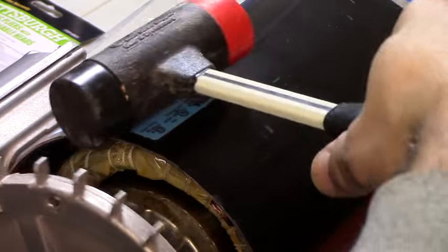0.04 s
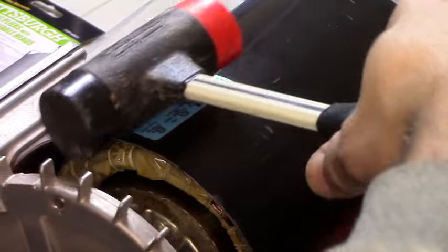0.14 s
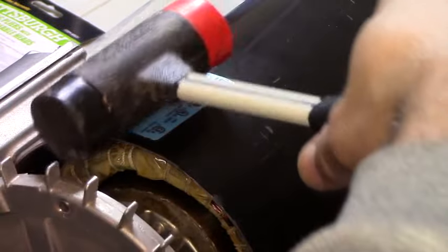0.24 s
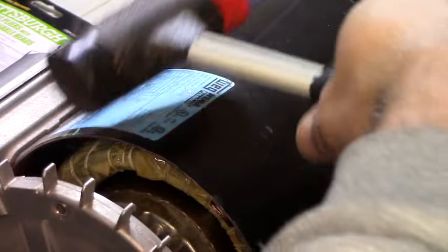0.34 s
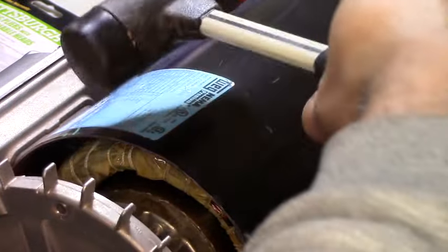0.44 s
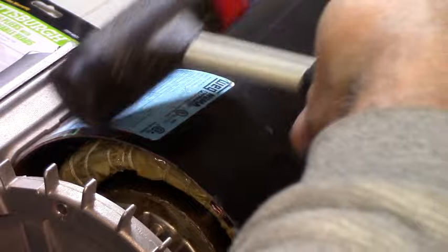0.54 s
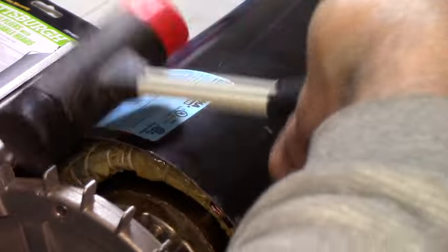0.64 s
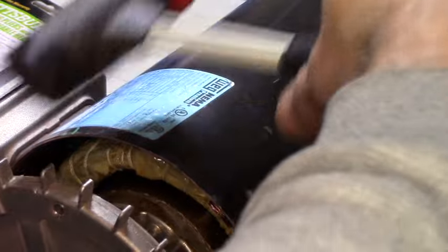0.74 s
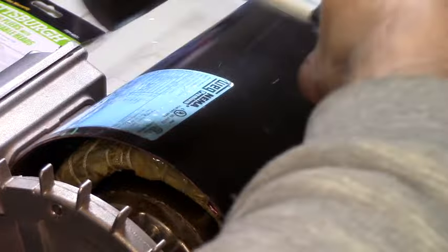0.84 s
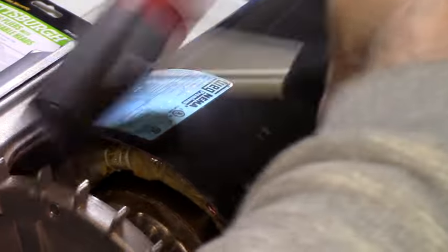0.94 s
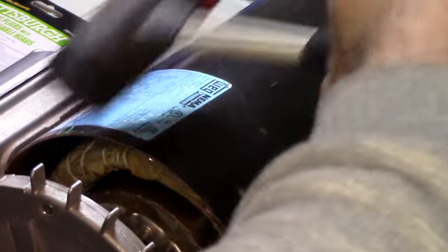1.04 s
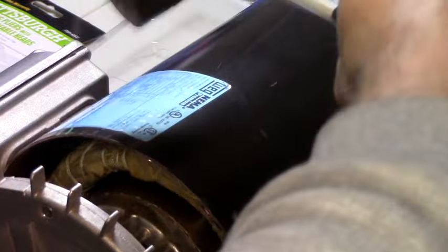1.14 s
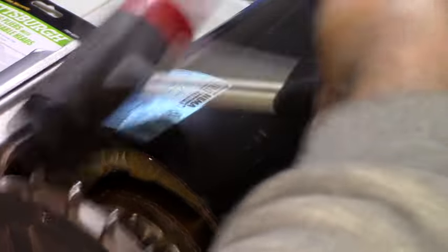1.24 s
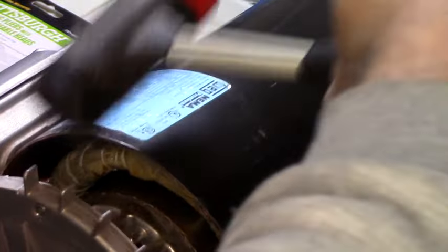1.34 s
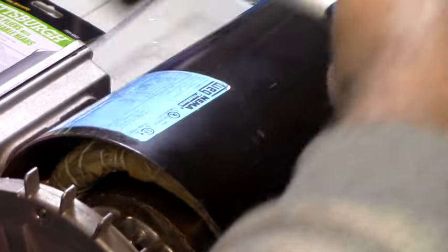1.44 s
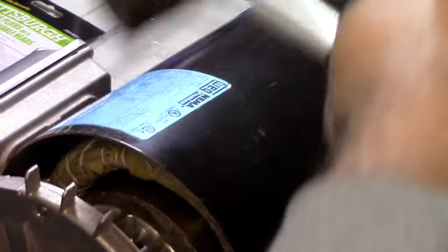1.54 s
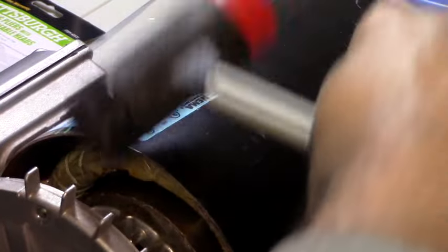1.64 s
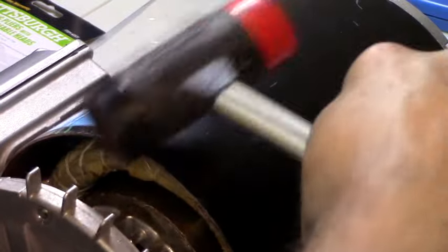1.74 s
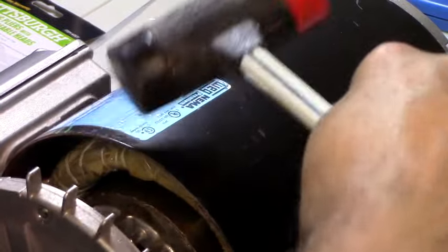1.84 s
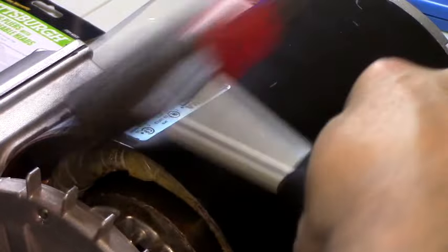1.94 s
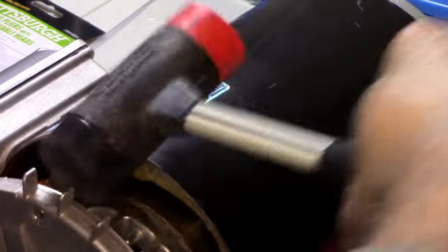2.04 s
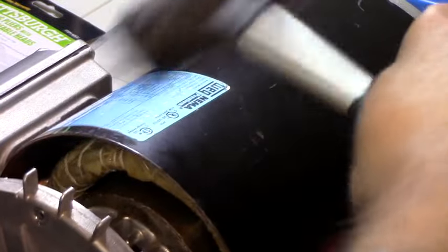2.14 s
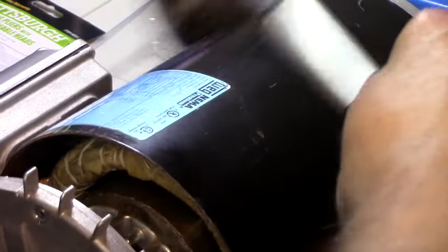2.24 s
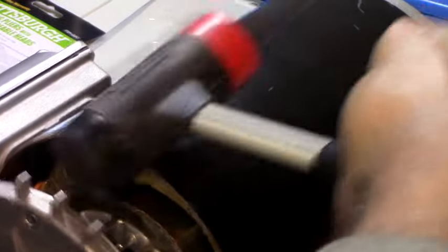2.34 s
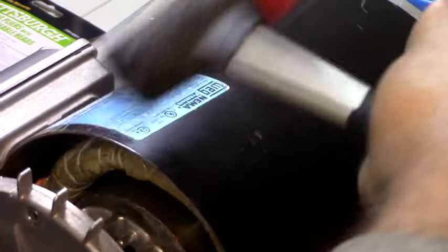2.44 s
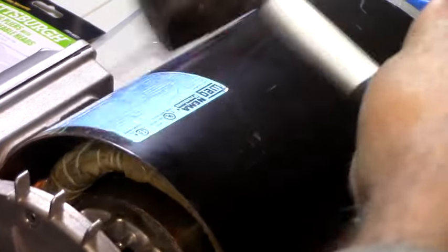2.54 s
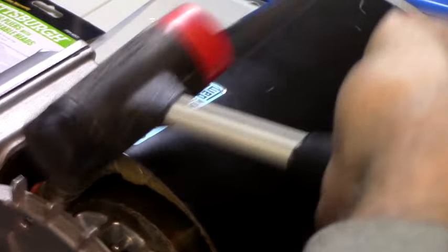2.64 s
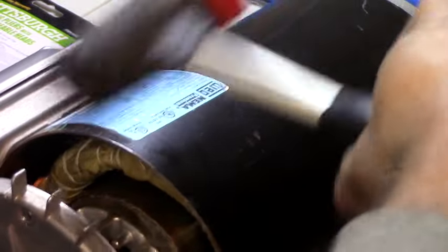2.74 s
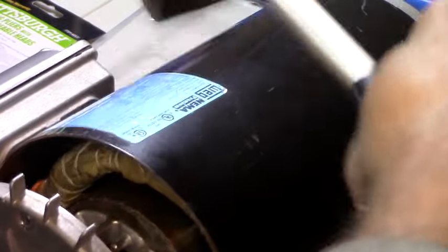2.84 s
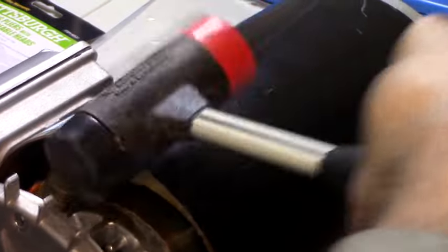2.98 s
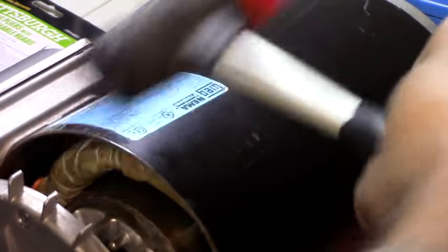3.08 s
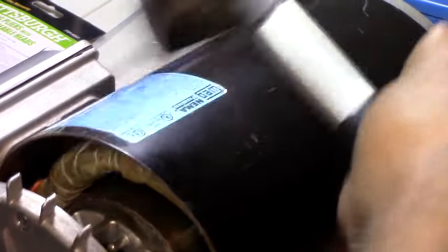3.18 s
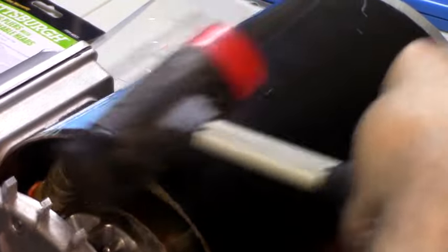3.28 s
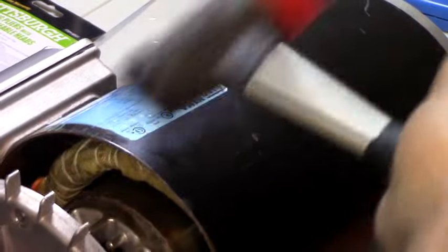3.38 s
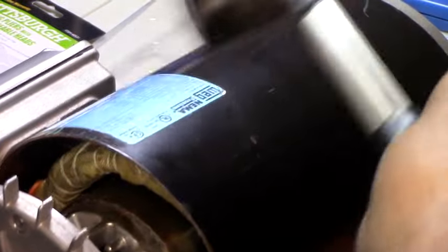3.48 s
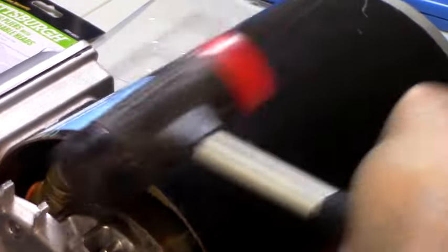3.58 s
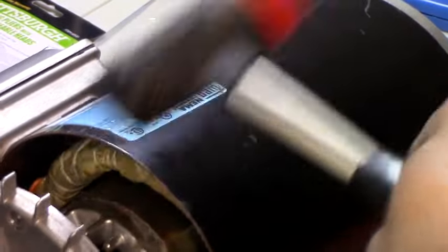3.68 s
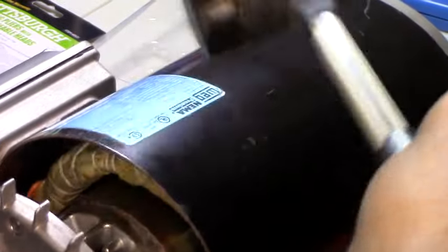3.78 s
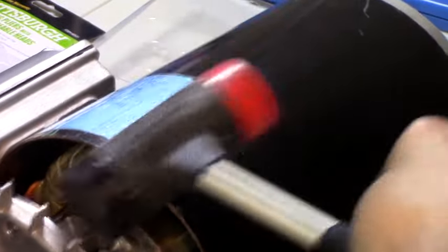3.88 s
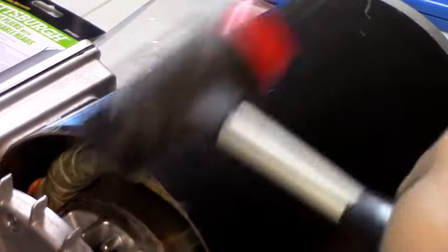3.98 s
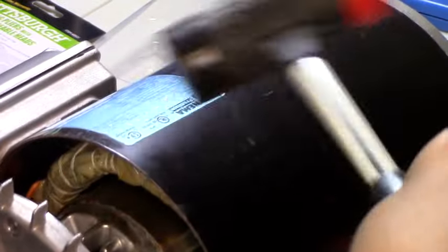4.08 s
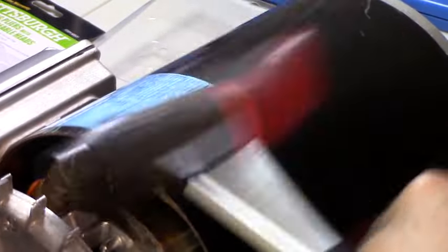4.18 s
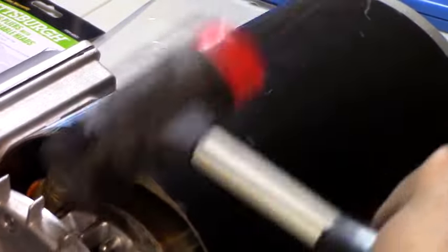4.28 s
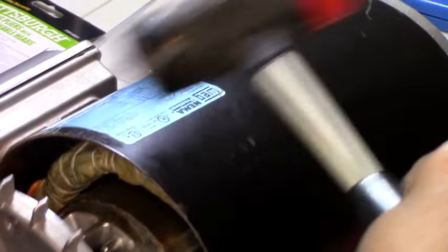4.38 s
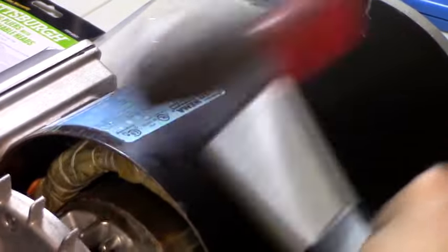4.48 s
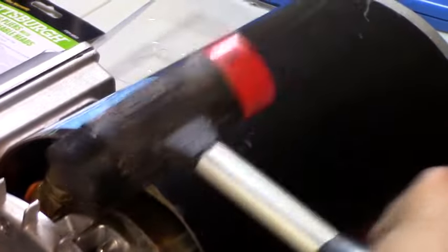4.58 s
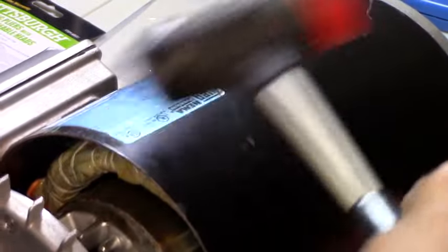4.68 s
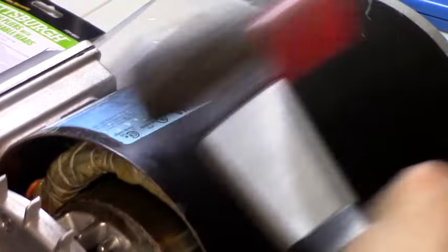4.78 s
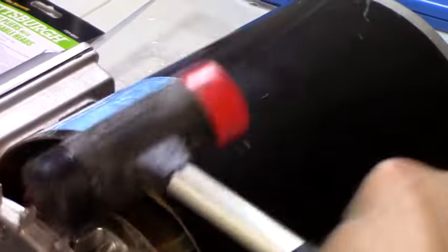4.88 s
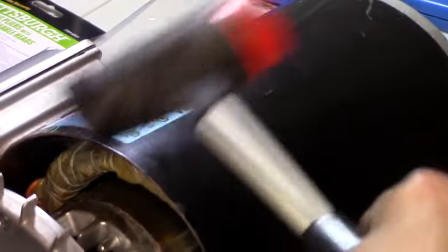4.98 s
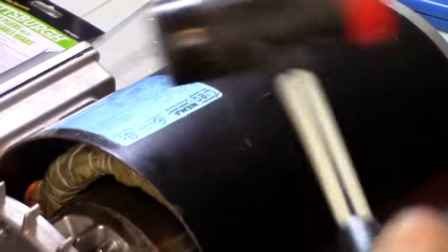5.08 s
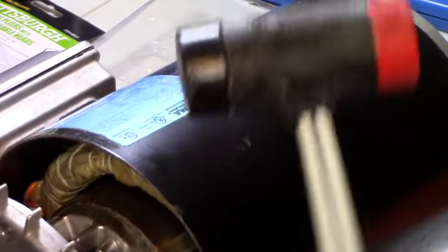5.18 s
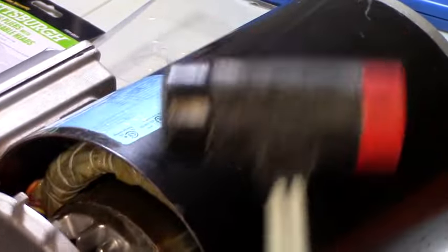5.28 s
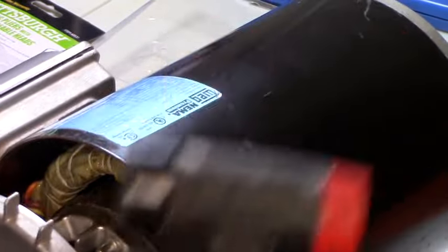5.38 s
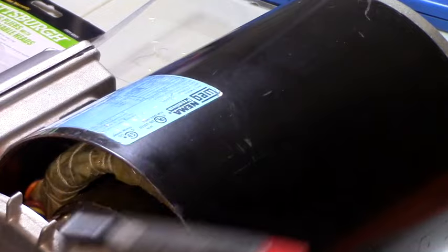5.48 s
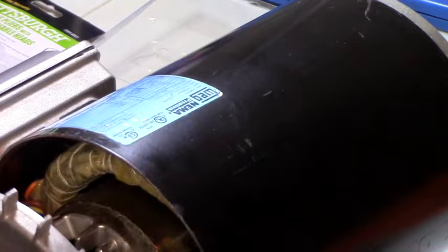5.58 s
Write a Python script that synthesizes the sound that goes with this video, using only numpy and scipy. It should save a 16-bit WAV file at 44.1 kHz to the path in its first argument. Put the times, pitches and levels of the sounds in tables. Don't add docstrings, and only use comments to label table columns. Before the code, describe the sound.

A hard plastic mallet beats a hollow steel casing at a steady pace, recorded close in a small, short-echoing room. Light scuffs precede the blows, and there is a pause with scraping and shimmering loose parts before the fourth hit. Low bench booms and knocking rattles follow the early blows, then fade as the strikes become clangier. Automatic gain squashes each attack. The last ring dies into a very quiet hush.

```python
import sys
import numpy as np
from scipy import signal
from scipy.fft import rfft, irfft
from scipy.io import wavfile
from scipy.ndimage import uniform_filter1d

SR = 44100
rng = np.random.default_rng(int(sys.argv[2]) if len(sys.argv) > 2 else 0)


def materialize(psi):
    bounded = np.clip(np.atleast_2d(psi).T, -1, 1)
    quanta = np.round(bounded * 32767).astype(np.int16)
    wavfile.write(sys.argv[1], SR, quanta)


def invert_db(level):
    return 10 ** (np.asarray(level, dtype=float) / 20)


N = 247828
LONG, SHORT = 2 ** 14, 2 ** 12
HALF = LONG // 2


def unit(x):
    return x / np.sqrt(np.sum(x ** 2))


def add(out, s, x):
    i = int(s * SR)
    out[i:i + len(x)] += x[:N - i]


def on_log(points, size):
    hz, value = np.transpose(points)
    bins_hz = np.fft.rfftfreq(size, 1 / SR)
    return np.interp(np.log(bins_hz + 1), np.log(hz), value)


def causal(points):
    cepstrum = irfft(np.log(invert_db(on_log(points, 4096))))
    cepstrum[1:2048] *= 2
    cepstrum[2049:] = 0
    return unit(irfft(np.exp(rfft(cepstrum))))


def ring(modes, scatter_db, shorten=1, size=HALF, detune=0.0032):
    hz, db, t60 = np.transpose(modes)[:, :, None]
    level_luck, pitch_luck = rng.standard_normal((2, len(hz), 1))
    t = np.arange(size) / SR
    envelope = invert_db(db + scatter_db * level_luck - 60 * t / (shorten * t60))
    return np.sum(envelope * np.sin(2 * np.pi * hz * (1 + detune * pitch_luck) * t), axis=0)


def burst(linger_s, rise_s, spikiness):
    t, noise = np.arange(SHORT) / SR, rng.standard_normal(SHORT)
    ticks = noise * np.abs(noise) ** (spikiness - 1)
    return unit(ticks * (1 - np.exp(-t / rise_s)) * np.exp(-t / max(linger_s, .001)))


# (frequency [Hz], t60 [s])
ROOM_DECAY = [(80, 0.58), (250, 0.4), (700, 0.25), (2000, 0.29), (5000, 0.25), (12000, 0.12)]


def reflections():
    noise, t = rfft(rng.standard_normal(LONG)), np.arange(LONG) / SR
    hz = [f for f, _ in ROOM_DECAY]
    tail = np.zeros(LONG)
    for share, (_, t60) in zip(np.eye(len(hz)), ROOM_DECAY):
        band = irfft(noise * on_log(list(zip(hz, share)), LONG))
        tail += band * invert_db(-60 * t / t60)
    return unit(tail)


def room(x, tail, wet_db, echo_db, shade_db=0):
    t = np.arange(LONG) / SR
    path = invert_db(wet_db) * unit(tail * (1 - np.exp(-t / 0.0029)) * np.exp(-(t / 0.29) ** 4))
    cluster = np.exp(-((t - 0.033) / .004) ** 2)
    path += invert_db(echo_db) * uniform_filter1d(unit(tail * cluster), size=9)
    path[0] += invert_db(shade_db)
    path[:16] += (1 - invert_db(shade_db)) * np.hanning(16) / 7.5
    return signal.fftconvolve(x, path)


# (frequency [Hz], density [dB per Hz])
HUSH_COLOUR = [(15, -57), (25, -19), (146, -0.5), (394, -6.5), (1810, -21.5), (2130, -21), (5420, -28),
               (15000, -41)]
# (time [s], level [dB])
HUSH_LEVEL = [
    (0, -71.5),
    (0.6, -65.5),
    (1.6, -69),
    (3.201, -67),
    (4.799, -73),
    (5.1, -73.5),
    (5.3, -81.5),
    (5.62, -89),
]


def air():
    hush = irfft(rfft(rng.standard_normal(N)) * invert_db(on_log(HUSH_COLOUR, N)), N)
    steps = np.repeat(rng.standard_normal(N // 16 + 1), 16)[:N]
    flutter_db = 30 * uniform_filter1d(steps, size=3000)
    level_db = np.interp(np.arange(N) / SR, *np.transpose(HUSH_LEVEL))
    return unit(hush) * np.sqrt(N) * invert_db(level_db + flutter_db)


# (time [s], level [dB], t60 [s], part)
JINGLES = [(0., -68.5, .04, "nut"), (0.104, -69, .07, "washer"), (0.112, -70, .08, "shim"),
           (.236, -63, .16, "washer"), (.39, -57, .035, "pin"), (.8, -73, .06, "pin"),
           (0.554, -69.5, .2, "spring"), (1.654, -85, .15, "spring"), (1.76, -57.5, .18, "plate"),
           (1.80, -56, .4, "collar"), (1.83, -59, .4, "collar"), (1.86, -60, .35, "collar"),
           (2.215, -57.5, .03, "shim"), (2.427, -71.5, .2, "spring"), (2.475, -50.5, .22, "bolt"),
           (5.13, -92, .09, "washer"), (5.22, -90, .1, "washer")]
PART_MODES = {"washer": [(4600, -13), (5300, -1), (5750, 5), (5950, -5.5), (6300, -11)],
              "pin": [(2045, 1.5)], "shim": [(2480, -2.5)], "nut": [(4480, 4), (5350, -3), (6240, -6)],
              "spring": [(10160, -3), (12600, -2.5)], "plate": [(1977, -2), (3530, 2), (5420, -19),
              (13600, -33)], "collar": [(3235, 1.5), (4160, -4), (6100, -2)], "bolt": [(4950, 1.5),
              (6250, -3.5), (7800, -16.5), (8440, -20), (11100, -24.5), (12700, -31)]}


def jingles(walls):
    out = np.zeros(N)
    for s, db, t60, part in JINGLES:
        for hz, own_db in PART_MODES[part]:
            pair = [(hz, own_db, .03), (hz, own_db - 11.0, .03)]
            cluster = ring(pair, scatter_db=4.0, detune=.013, size=2048)
            linger_s = t60 * (5000 / hz) ** .8 / np.log(1000)
            chatter = burst(linger_s, rise_s=.004, spikiness=1.7)
            add(out, s, invert_db(db + 4) * signal.fftconvolve(chatter, cluster))
    return room(out, walls, wet_db=-4.5, echo_db=-14)[:N]


# (time [s], level [dB], linger [s], kind)
TAPS = [(.263, -34.5, 0.0044, "palm"), (.380, -61, 0.006, "shaft"), (0.387, -44, 0.0045, "shaft"),
        (.423, -62, 0.0044, "shaft"), (0.478, -42, 0.01, "shaft"), (0.551, -35, 0.013, "face"),
        (0.569, -35.5, 0.0095, "face"), (0.596, -46, .004, "palm"), (1.652, -35, 0.0092, "face"),
        (1.756, -40.5, 0.0095, "slide"), (1.81, -50, 0.015, "drag"), (1.862, -53, 0.037, "drag"),
        (2.326, -51.5, .003, "tick"), (4.155, -55.5, 0.0093, "shaft"), (4.163, -34, 0.02, "face")]
TAP_KINDS = ("palm", "shaft", "face", "slide", "drag", "tick")
# (frequency [Hz], density [dB per Hz])
TAP_COLOURS = [
    [(40, -45), (120, -11), (250, 0.5), (420, -6.5), (800, -12.5), (1100, -37.5), (3000, -55.5),
     (14000, -83.5)],
    [(45, -5), (270, -2.5), (674, 4.5), (1000, -21), (1970, -6), (3560, -19), (4900, -4.5), (13000, -37)],
    [(60, -36.5), (180, -13), (689, -4.5), (1400, -39.5), (2590, -4.5), (3100, -17.5), (7060, -31.5),
     (13500, -60.5)],
    [(60, -42), (325, 0), (927, -5), (1220, -29), (2210, -46), (3400, -15.5), (4580, -44), (14000, -63)],
    [(60, -45), (390, -20), (906, 5), (1220, -16), (2470, -30), (3110, -26), (6160, -23.5), (14000, -84.5)],
    [(6000, -30.5), (11000, -15), (14500, -5.5), (16000, -9.5)],
]


def taps(walls):
    out, colours = np.zeros(N), dict(zip(TAP_KINDS, map(causal, TAP_COLOURS)))
    for s, db, linger_s, kind in TAPS:
        scrape = burst(linger_s, rise_s=0.0045, spikiness=3.6)
        add(out, s, invert_db(db + 27) * signal.fftconvolve(scrape, colours[kind]))
    return room(out, walls, wet_db=-4.5, echo_db=-14.5)[:N]


# (frequency [Hz], level [dB], t60 [s])
SHELL_MODES = [(277.1, -15.5, 1), (645.6, -4.5, 0.9), (689, -15, 0.16), (895.5, -4, 0.94), (949, -1, 0.18),
               (1026, 3, 0.078), (1066, -20, 0.088), (1274, -8, 0.97), (1588, -11.5, 1), (1744, -9.5, 0.87),
               (1997, -2.5, 0.13), (2654, -27, 0.22), (2925, -4.5, 0.29), (3463, 3.5, 0.3),
               (3555, -6, 0.32), (5200, -15, 0.66), (4760, -6, 0.31), (4640, -14.5, 0.81),
               (5410, 11, 0.024), (5200, -1, 0.21), (5257, 5.5, 0.067), (5230, -3.5, 0.43),
               (5230, -1.5, 0.074), (5664, -4, 0.047), (6523, -12.5, 0.24), (5900, -11, 0.14),
               (6480, -14, 0.18), (6560, -5.5, 0.57), (6340, -16, 0.4), (7570, -7.5, 0.23)]


def shell_ring():
    noise = uniform_filter1d(rng.standard_normal(HALF), size=150)
    buzz = unit(noise) * np.sqrt(HALF)
    fade = np.exp(-(np.arange(HALF) / SR / .16) ** 4)
    modes = ring(SHELL_MODES, scatter_db=1.5, shorten=0.24, detune=.008)
    return unit(modes * (1 + 1.2 * buzz) * fade)


# (frequency [Hz], level [dB], t60 [s])
THUMP_MODES = [(710, 8.5, 0.085), (600.7, -7, 0.1), (750, -12.5, .08), (469.8, -8, 0.015),
               (439, -10, 0.055), (648, -8.5, 0.078), (1590, -10.5, .07), (1751, -19, 0.13),
               (2960, -13, 0.026)]


def thump():
    modes = ring(THUMP_MODES, scatter_db=3.5, detune=0.015, shorten=0.34)
    return unit(np.convolve(modes, np.hanning(12))[:HALF])


# (time [s], level [dB], crack over thud [dB], ring over thud [dB])
BLOWS = [(0.6067, -14, -8.5, -20.5), (.935, -5, 1.5, -12), (1.227, -6.5, 2.5, -6.5),
         (1.939, -8.5, 4.5, -7.5), (2.288, -3.5, 6, -4), (2.605, -4, 2.3, 0.5), (2.906, -4.5, 5.5, 3),
         (3.223, -3.5, 8.5, 5), (3.533, -5, 5.5, 2.5), (3.844, -7, 9.5, 4), (4.168, -9, 3, 3),
         (4.493, -7.5, 2.8, 8), (4.796, -7.5, 2.5, 8)]
# (frequency [Hz], density [dB per Hz])
CRACK = [(40, -47), (150, -8.5), (380, -21.5), (700, 5), (900, -9), (1250, -12.5), (2850, -13.5),
         (4100, -17), (4600, -3), (5300, -5), (5900, -14.5), (7500, -26.5), (13100, -55), (15600, -83.5)]
SHARES_HZ = (600, 2200, 4500, 5400, 10000)


def mallet(walls):
    out, crack = np.zeros(N), causal(CRACK)
    for s, db, crack_db, ring_db in BLOWS:
        lean_db = -4.5 + 1.32 * s
        top_db = (crack_db + ring_db) / 2 - 3
        shares_db = (0, crack_db, ring_db - lean_db, ring_db + lean_db, top_db)
        blow = shell_ring() + invert_db(-7) * thump()
        add(blow, 0, invert_db(4.0) * crack)
        grit = burst(linger_s=0.0021, rise_s=0.001, spikiness=0.77)
        add(blow, 0, invert_db(4) * signal.fftconvolve(grit, crack))
        blow = signal.fftconvolve(blow, causal(list(zip(SHARES_HZ, shares_db))))
        tail = walls + 1.065 * reflections()
        heard = room(blow, tail, wet_db=-3.5, echo_db=-20.5, shade_db=-9)
        add(out, s, invert_db(db + 10.0) * heard)
    return out


# (first landing [s], gap [s], boom [dB], knock [dB])
ROCKS = [(.674, 0.064, -34.5, -33.5), (0.805, 0.056, -38.5, -41.5), (1.083, 0.059, -33.5, -33.5),
         (1.379, 0.067, -35, -37.5), (2.09, .072, -32.5, -30), (2.444, 0.068, -40.5, -35),
         (2.757, 0.074, -36, -39.5), (3.056, 0.085, -50.5, -49), (3.386, 0.074, -60.5, -54.5),
         (3.63, 0.13, -45, -51), (4.003, 0.071, -62.5, -56), (4.297, .104, -57, -54.5),
         (4.604, 0.048, -56.5, -47.5), (4.736, 0.049, -58.5, -56.5), (4.942, 0.097, -61.5, -59.5),
         (5.22, 0.096, -78.5, -72), (5.399, .079, -84.5, -85)]


def landings():
    return [(s + gap * k, boom_db - 3.5 * k ** 2, knock_db - 5.5 * k ** 2)
            for s, gap, boom_db, knock_db in ROCKS for k in range(3)]


# (frequency [Hz], level [dB], t60 [s])
BENCH_BOOM = [(165.9, 5, 0.12), (150, -10, 0.027), (240, -5, 0.079), (90, -10.5, 0.1)]
# (frequency [Hz], level [dB], t60 [s])
BENCH_KNOCK = [(803.6, 14, 0.031), (600, -8.5, 0.027), (885, -15.5, 0.019), (970, 10.5, 0.022),
               (353.5, -10, 0.21), (2090, -18.5, 0.072), (4720, -31, 0.075)]
# (frequency [Hz], level [dB])
RATTLE = [(100, -30.5), (250, 8), (800, 7), (1200, -4.5), (2400, -16), (4200, -23.5), (6300, -20.5),
          (7500, -38.5), (12000, -54.5)]


def rocking(walls):
    boom, out = np.zeros(N), np.zeros(N)
    t = np.arange(HALF) / SR
    swell, cushion = 1 - np.exp(-(t / 0.017) ** 2), 1 - np.exp(-(t / 0.0043) ** 2)
    rattle = causal(RATTLE)
    chatter = causal([(500, -18), (1500, 3.5), (4500, -7.5), (7000, -18), (12000, -46.5)])
    for s, boom_db, knock_db in landings():
        low = swell * ring(BENCH_BOOM, scatter_db=1.0, detune=0.011)
        add(boom, s, invert_db(boom_db + 10.5) * low)
        knock = cushion * ring(BENCH_KNOCK, scatter_db=1.5, detune=0.0083)
        add(out, s, invert_db(knock_db - 3) * knock)
        hits = burst(linger_s=0.012, rise_s=.008, spikiness=2.4)
        add(out, s, invert_db(knock_db + 20) * signal.fftconvolve(hits, rattle))
        hits = burst(linger_s=0.016, rise_s=.03, spikiness=2.2)
        add(out, max(s - .03, 0), invert_db(knock_db + 5) * signal.fftconvolve(hits, chatter))
    return boom + room(out, walls, wet_db=-5, echo_db=-23.0)[:N]


def scene():
    walls = reflections()
    return (jingles(walls) + taps(walls) + mallet(walls) + rocking(walls))[None]


def gain_control():
    gain, t = np.ones(N), np.arange(SHORT) / SR
    add(gain, BLOWS[0][0], (invert_db(6.5) - 1) * np.exp(-(t / 0.012) ** 4))
    reopening = np.clip(t / 0.035, .003, 1) ** 1.356
    for s, *_ in BLOWS[1:]:
        add(gain, s - .0005, reopening - 1)
    return gain


# (frequency [Hz], level [dB])
MIC = [(20, -51.5), (45, -25), (80, -9.5), (130, -5), (200, -3.5), (400, 2.5), (13700, 2.5), (14100, -8.5),
       (16000, -15.5)]


def microphone(x):
    return signal.fftconvolve(x, causal(MIC))[:N]


def low_pass(x):
    return signal.sosfilt(signal.butter(12, 15710, fs=SR, output="sos"), x)


def record(dry):
    heard = microphone(dry[0] * gain_control()) + air()
    return low_pass(heard[None])


dry = scene()
out = record(dry)
materialize(out)
```